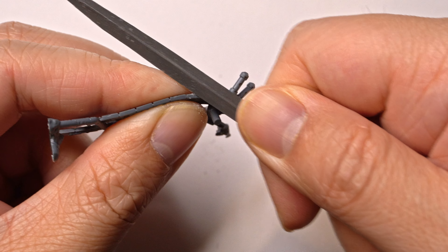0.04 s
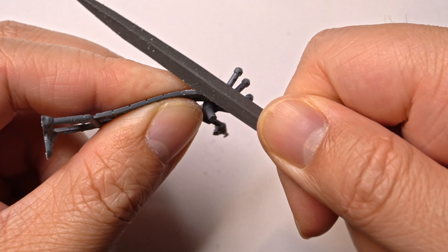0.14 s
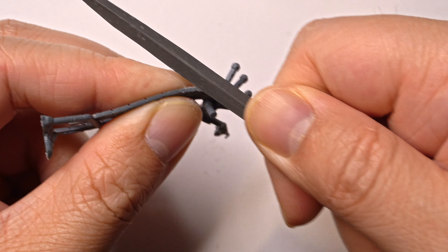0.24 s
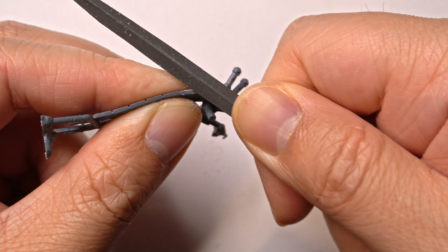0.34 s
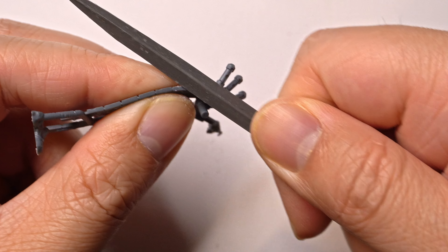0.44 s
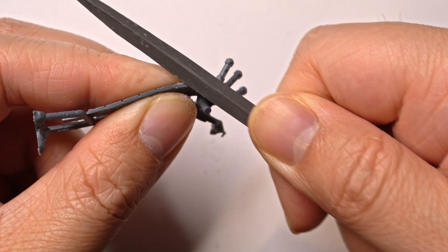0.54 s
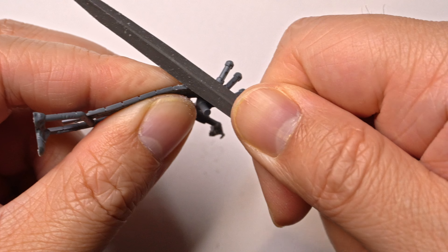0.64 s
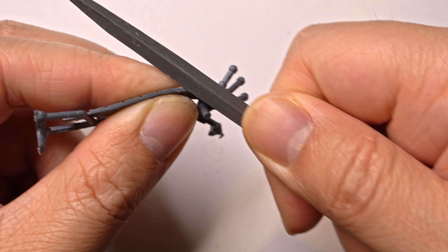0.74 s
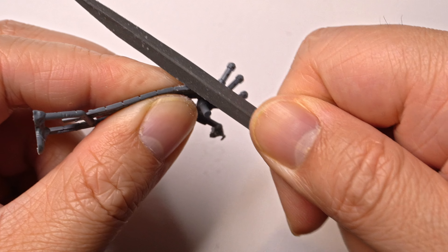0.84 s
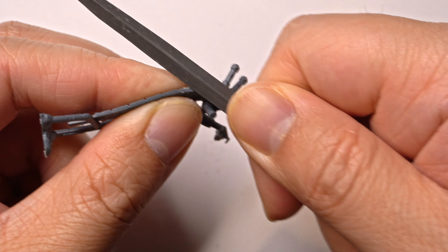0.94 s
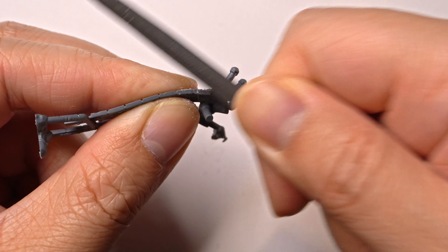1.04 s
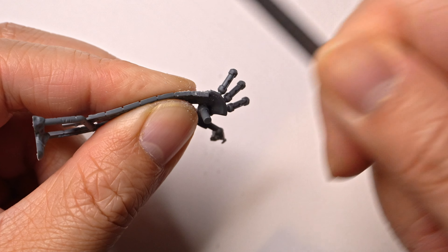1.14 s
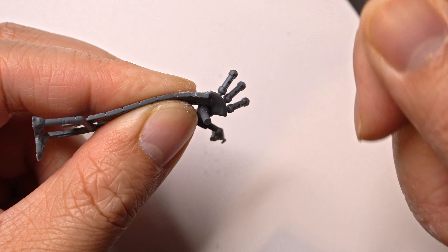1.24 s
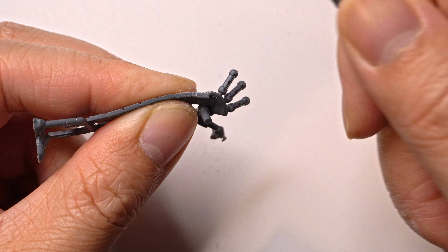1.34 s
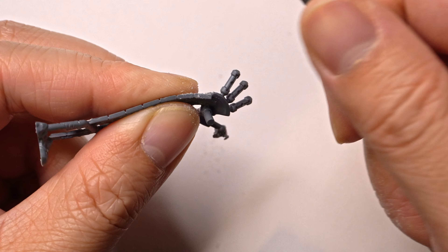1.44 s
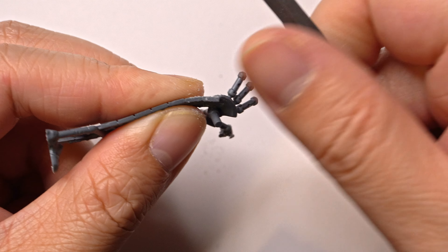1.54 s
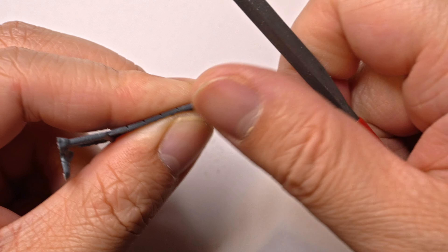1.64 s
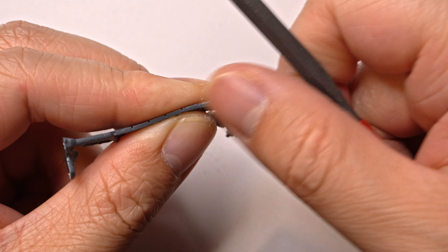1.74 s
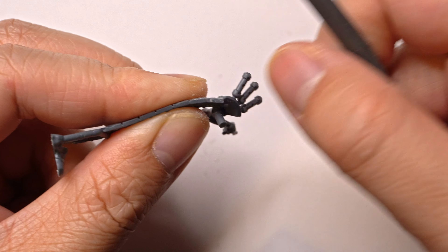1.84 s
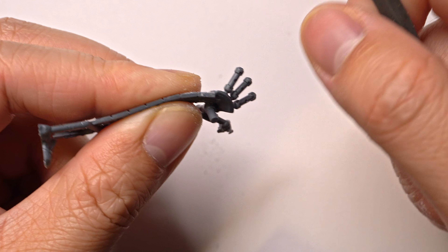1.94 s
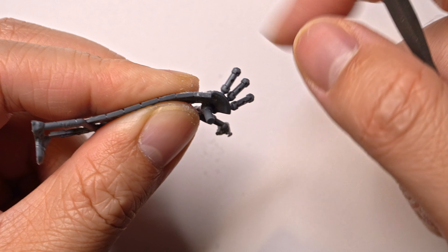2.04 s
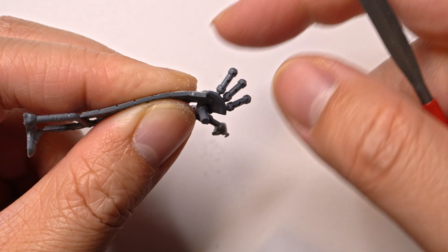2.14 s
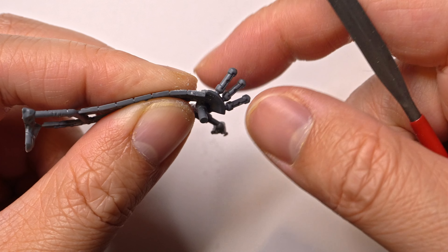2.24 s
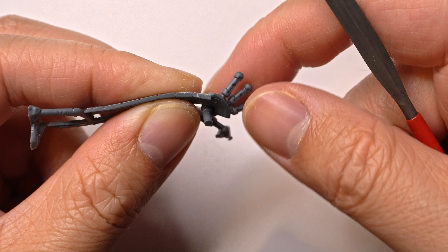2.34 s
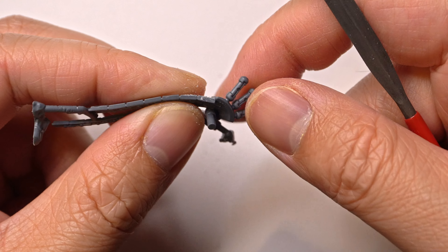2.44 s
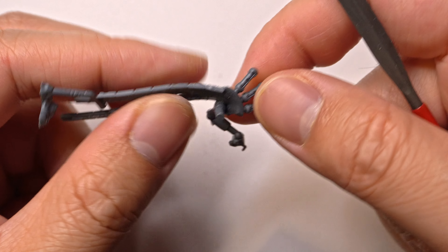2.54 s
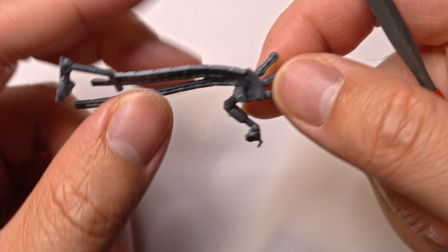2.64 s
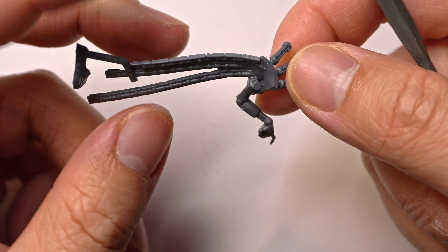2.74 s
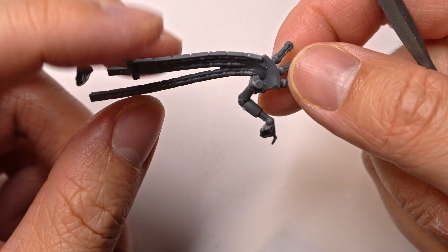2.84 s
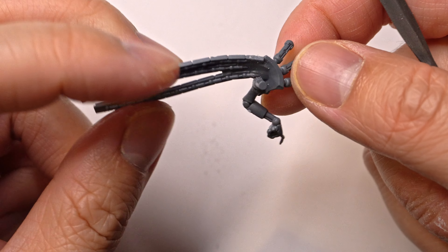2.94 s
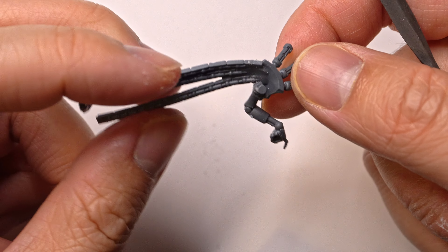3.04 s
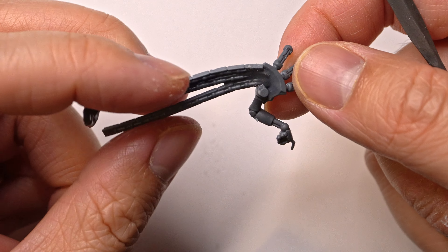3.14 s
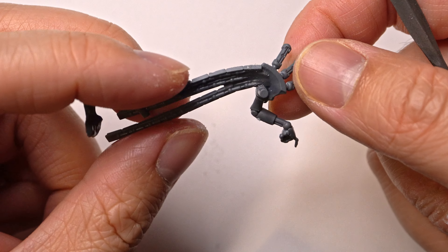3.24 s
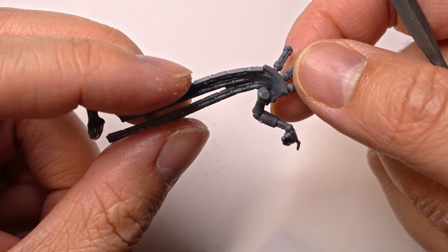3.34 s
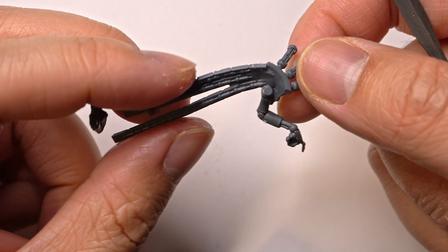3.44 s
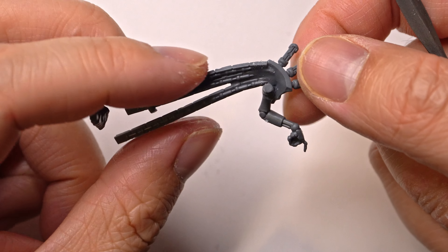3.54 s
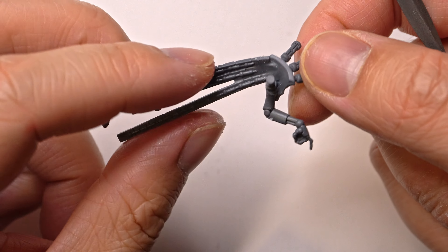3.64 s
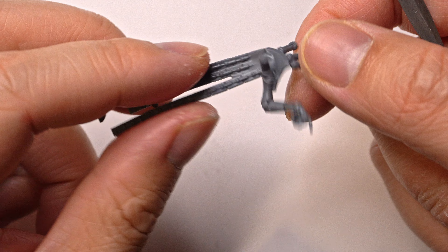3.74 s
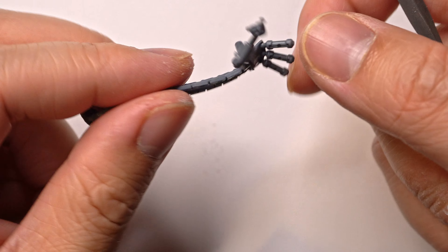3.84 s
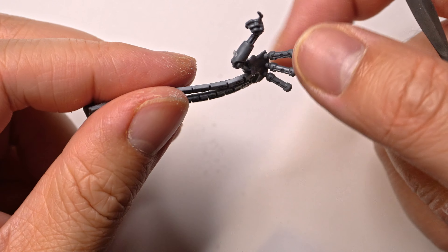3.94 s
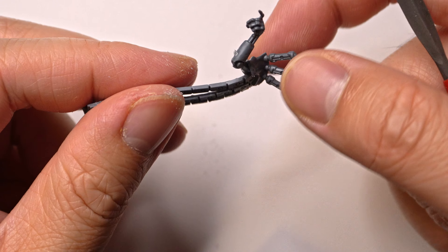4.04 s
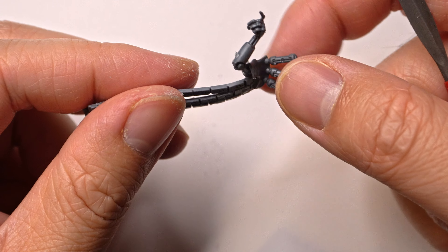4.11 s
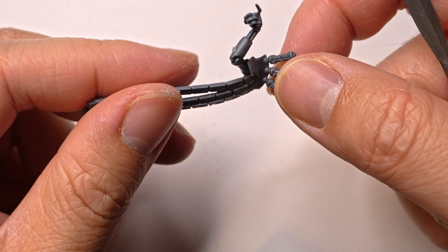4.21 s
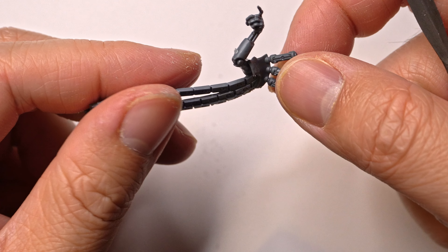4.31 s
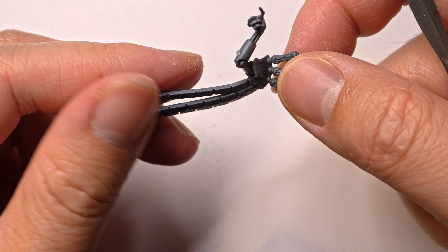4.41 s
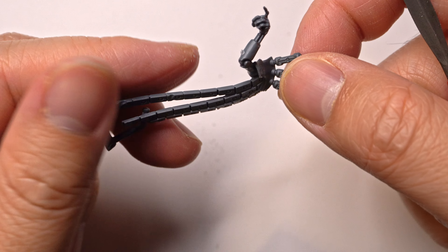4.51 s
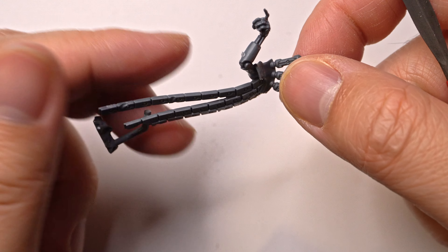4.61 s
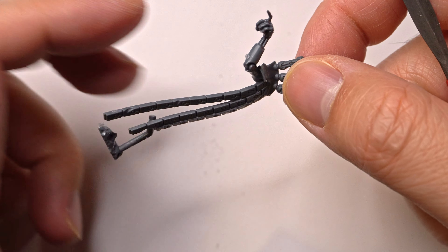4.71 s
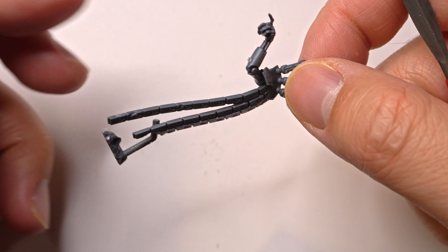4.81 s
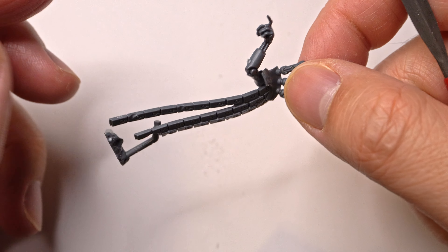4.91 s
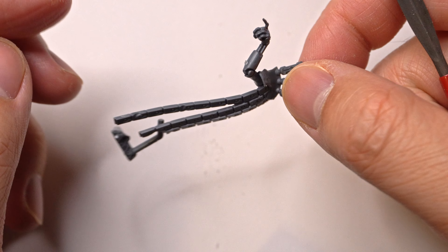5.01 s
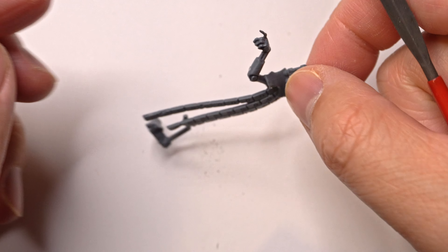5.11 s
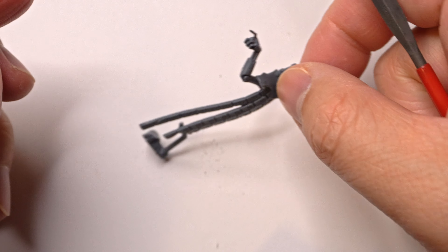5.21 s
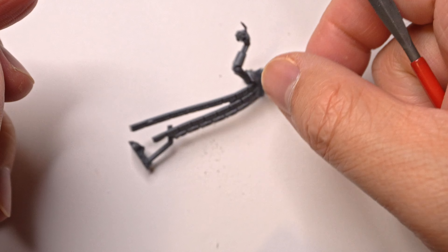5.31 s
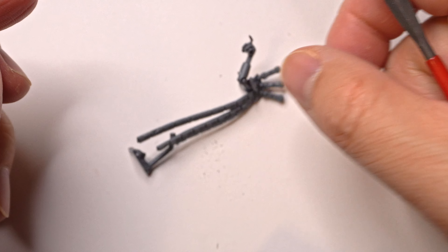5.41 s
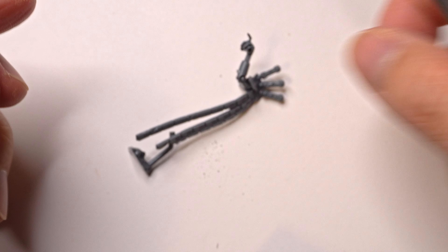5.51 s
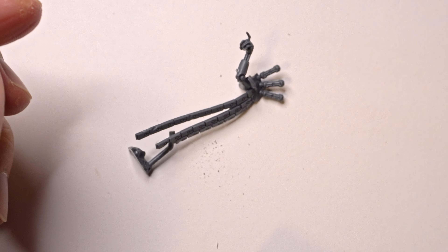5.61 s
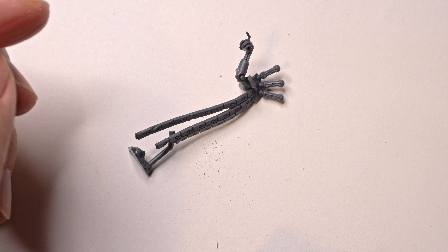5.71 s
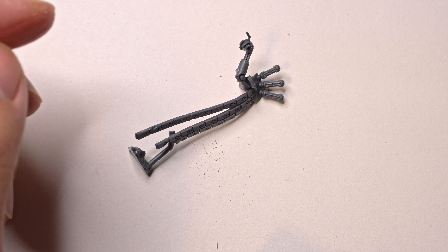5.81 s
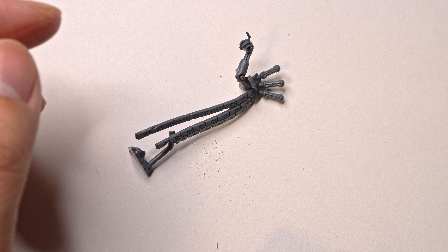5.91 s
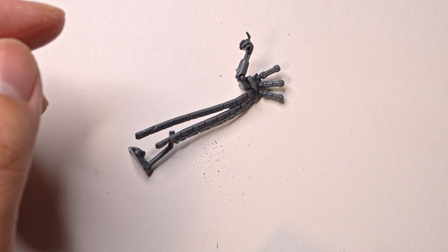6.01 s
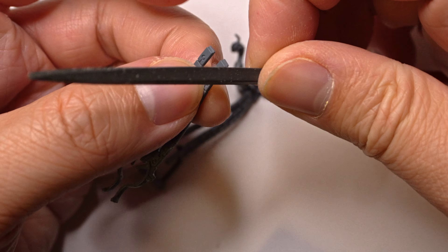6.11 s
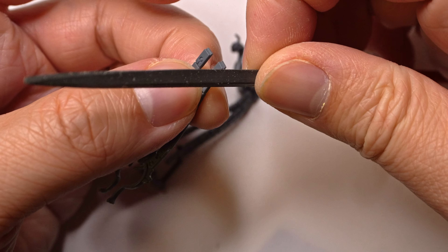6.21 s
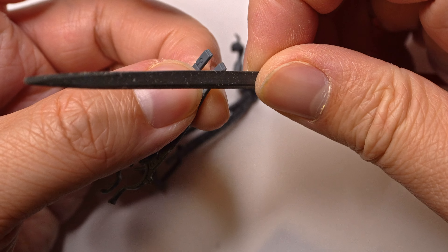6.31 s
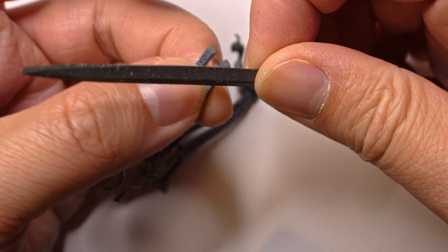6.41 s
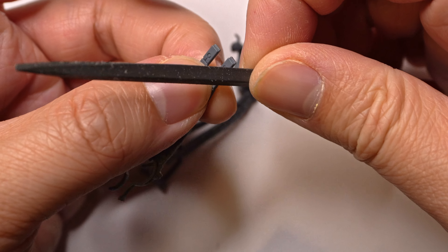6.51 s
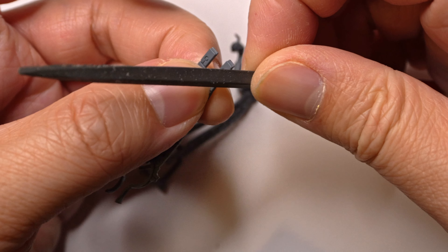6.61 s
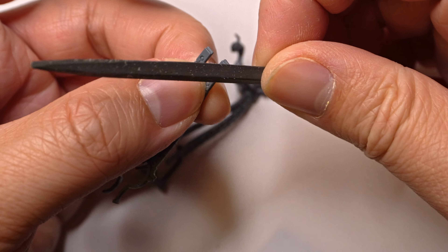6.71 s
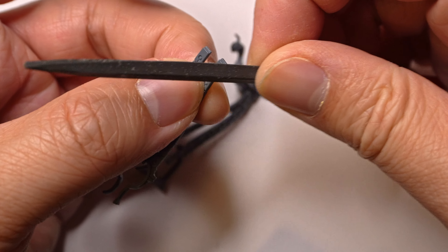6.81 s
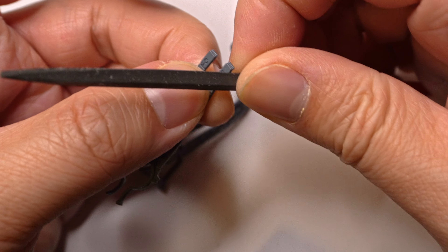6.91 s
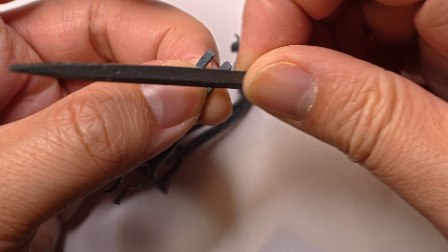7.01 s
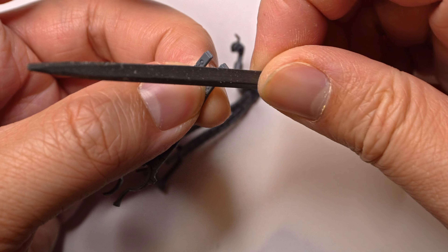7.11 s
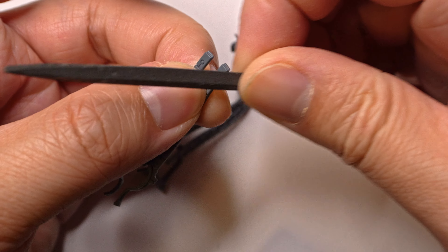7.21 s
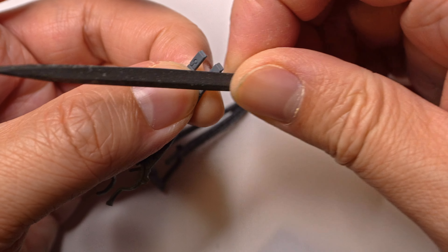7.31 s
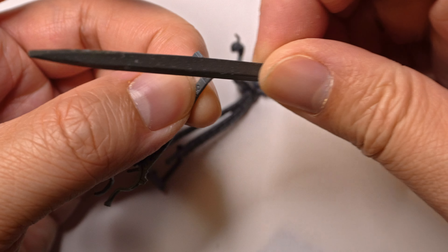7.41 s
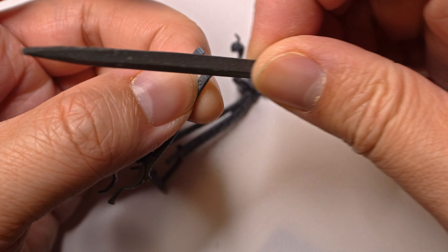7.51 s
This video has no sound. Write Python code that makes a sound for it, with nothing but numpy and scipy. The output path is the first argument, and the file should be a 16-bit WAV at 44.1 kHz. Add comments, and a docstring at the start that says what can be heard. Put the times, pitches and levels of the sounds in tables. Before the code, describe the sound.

A very close, dry stereo perspective in a quiet room, with faint air and a low stand hum that swells during work. From about 0.07 to 1.0 seconds, a needle file makes six quick rasps on a thin plastic figure, roughly six per second, each a short gritty hiss with a buzzing low judder and small ticks. From 1.1 to 5 seconds it is much quieter: fingertips rub, a stronger scuff and nail scrape come near 1.8, a soft release near 2.75, and a tiny limb flicks at 3.8. At 5.1 a hand swishes over paper; the figure touches down, stutters along, drops with a sharp click and boomy knock at 5.36, then rocks from 5.48 in rapid, shrinking taps. Near silence follows. From 6.43 to the end, seven strokes on a smaller bit rasp brighter, with irregular clusters of loud, crisp plastic snaps, strongest around 6.85 and 7.2.

```python
"""Filing small plastic parts

A needle file rasps over a plastic model figure and later a smaller bit, between two close microphones.
Its teeth are grainy noise; uneven slips and snags are impulses that click in the plastic and shake the grip.
In between, the figure is turned in the hand as noise bursts and thumps, then dragged over the desk in slips.
It drops and rocks to rest in shrinking steps. A quiet room and a humming microphone stand lie underneath.
"""
import sys
import numpy as np
from scipy import signal
from scipy.fft import rfft, irfft
from scipy.io import wavfile
from scipy.ndimage import uniform_filter1d

SR = 44100
rng = np.random.default_rng(int(sys.argv[2]) if len(sys.argv) > 2 else 0)


def wrap_up_sound(samples):
    """Save the sound to the file named by the first command line argument, as 16-bit audio."""
    columns = np.atleast_2d(samples).T
    # keep every value between -1 and 1, then stretch to whole-number steps
    tamed = np.clip(columns, -1, 1)
    steps = np.round(tamed * 32767).astype(np.int16)
    wavfile.write(sys.argv[1], SR, steps)


N = 333396
T = np.arange(N) / SR  # time of every sample [s]
TOP_HZ = 15800  # upper limit of the sound


def undb(db):
    """Turn decibels into gain."""
    return 10 ** (np.asarray(db) / 20)


def curve(rows, column):
    """Gain that follows a dB column over time, silent before and after it."""
    rows = np.array(rows)
    return undb(np.interp(T, rows[:, 0], rows[:, column], left=-np.inf, right=-np.inf))


def pulses(times, sizes):
    """One impulse of the given size at each time."""
    inside = (times >= 0) & (times < T[-1])
    samples = (times[inside] * SR).astype(int)
    return np.bincount(samples, sizes[inside], N)


def response(spectrum, size=2048):
    """Impulse responses with the given spectrum that start at once, scaled to a mean energy of 1."""
    hz, *sides = np.transpose(spectrum)
    log_hz = np.log(np.fft.rfftfreq(size, 1 / SR) + 1)
    gains = undb([np.interp(log_hz, np.log(hz), db) for db in sides])
    # folding the cepstrum moves the energy to the start (minimum phase)
    cepstrum = irfft(np.log(gains))
    cepstrum[:, 1:size // 2] *= 2
    cepstrum[:, size // 2 + 1:] = 0
    h = irfft(np.exp(rfft(cepstrum)))
    return h / np.sqrt(np.sum(h ** 2) / len(h))


def colour(x, spectrum):
    """Pass a sound through a body, which favours some frequencies over others."""
    return signal.oaconvolve(np.atleast_2d(x), response(spectrum), axes=1)[:, :N]


def thump(hits, spectrum, lag_ms, polarity):
    """Each impulse swings a body; the right microphone hears it a little later, scaled by polarity."""
    peak = np.abs(response(spectrum)).max(axis=1).mean()
    left, right = colour(hits, spectrum)[[0, -1]] / peak
    return np.array([left, polarity * np.interp(T - lag_ms / 1000, T, right)])


def noise(opposed):
    """Noise pair; a thing vibrating between the microphones pushes on one as it pulls on the other."""
    share = np.clip(opposed, 0, 1)
    push_pull = rng.standard_normal(N) * np.array([[1], [-1]])
    separate = rng.standard_normal((2, N))
    return np.sqrt(share) * push_pull + np.sqrt(1 - share) * separate


def fade(hits, decay_s):
    """Envelope of impulses that each die away; their powers add."""
    power = signal.lfilter([1], [1, -np.exp(-2 / (decay_s * SR))], hits ** 2 + 1e-18)
    return np.sqrt(power)


def grains(per_s, spread_db, decay_s):
    """Envelope of dense tiny slips of uneven size, scaled to an rms of 1."""
    sizes = undb(spread_db * np.minimum(rng.exponential(size=N), 4))
    happens = rng.random(N) < per_s / SR
    envelope = fade(sizes * happens, decay_s)
    return envelope / np.sqrt(np.mean(envelope ** 2))


def walk(rate):
    """Smooth random drift towards a new value `rate` times a second, spread near 1."""
    k = int(SR / rate)
    steps = np.repeat(rng.standard_normal(N // k + 1), k)
    return np.sqrt(2) * uniform_filter1d(steps, k)[:N]


def slips(rate_hz, jitter, scatter_db, count=400):
    """Times and sizes of stick-slip releases at a changing rate; the first comes as the motion starts."""
    chance = rng.standard_normal((count, 2))
    chance[0] = 0
    travel = np.cumsum(rate_hz) / SR
    marks = np.cumsum(np.exp(jitter * chance[:, 0])) - 1
    reached = marks < travel[-1]
    times = T[np.searchsorted(travel, marks[reached], side="right")]
    return times, undb(scatter_db * chance[reached, 1])


def swell(centre_s, width_s):
    """Speed of one movement: it grows and dies away smoothly."""
    return np.exp(-np.minimum(((T - centre_s) / width_s) ** 2, 20))


def burst(centre_s, half_s):
    """A short slide that starts and stops quickly and is level in between."""
    return np.exp(-np.minimum(((T - centre_s) / half_s) ** 2, 4) ** np.e)


# the fingers take a new grip: (time [s], level [dB])
REGRIPS = [(1.1, -53), (1.79, -43.5), (2.52, -51.5), (2.9, -63), (3.46, -52.5), (4.17, -50)]


def gripping():
    """How hard the fingers are working as they take a new grip."""
    half_length_s = 0.14
    return sum(undb(db) * swell(s, half_length_s) for s, db in REGRIPS)


# tone of the room: (frequency [Hz], level [dB])
ROOM_TONE = [(25, 1), (80, 5.5), (200, 0.5), (600, -9), (2000, -16), (8000, -17.5), (15500, -18.5)]
# hum of the microphone stand: (frequency [Hz], level [dB])
STAND_TONE = [(20, -35.5), (38, -17.5), (45, 2.5), (53, -30), (90, -13.5), (300, -35.5), (900, -76)]
ROOM_DB = -58.5  # middle of a slight drift
STAND_REST_DB, STAND_FILING_DB = -56.5, -38  # hum at rest, and what filing adds
STAND_GRIP_DB = 4  # relative to the new grip
FILING_ENDS_S, FILING_RESUMES_S = 1.07, 6.5
LIGHT_FILING_DB = -2  # the small bit takes less effort


def room():
    """A quiet room; the microphone stand hums low, more while the arms are filing or changing grip."""
    figure_work = T < FILING_ENDS_S
    small_bit_work = undb(LIGHT_FILING_DB) * (T > FILING_RESUMES_S)
    working = uniform_filter1d(figure_work + small_bit_work, size=8000)
    effort = undb(STAND_REST_DB) + undb(STAND_FILING_DB) * working + undb(STAND_GRIP_DB) * gripping()
    air = colour(noise(opposed=0.37), ROOM_TONE) * undb(ROOM_DB + 0.55 * walk(7.8))
    hum = colour(noise(opposed=0.62), STAND_TONE) * effort * undb(2 * walk(2))
    return air + hum


# the file snags once on an edge: (time [s], tick level [dB], thump level [dB])
SNAGS = [(0.2491, -21, -13.5), (0.4484, -17, -22), (0.5855, -20, -12.5), (0.7596, -23.5, -16.5),
         (0.9133, -21, -10), (1.041, -21, -23), (6.4278, -13, -13.5), (6.4434, -21, -12),
         (6.4515, -18.5, -13.5), (6.4735, -12.5, -14.5), (6.6502, -11.5, -25), (6.659, -9.5, -25),
         (6.8484, -0.5, -16), (6.856, -6, -20), (6.8667, -6.5, -20), (7.0657, -13.5, -18),
         (7.0783, -12.5, -20), (7.148, -12.5, -27), (7.1681, -11.5, -15.5), (7.1918, -4.5, -16.5),
         (7.2005, -2.5, -19), (7.2074, -11, -19), (7.2148, -10.5, -20), (7.224, -7, -20),
         (7.2383, -4.5, -30), (7.5134, -14.5, -20.5), (7.5335, -6.5, -18), (7.5522, -11.5, -21)]
SNAG_HOLD_S = .004  # no ordinary slips this close to a snag
# where the file is fastest, how it speeds up and slows, as shares of the stroke
STROKE_PEAK, STROKE_RISE, STROKE_FALL = .42, .47, .64
JUDDER_JITTER, JUDDER_SCATTER_DB = .2, 1  # unevenness of the slips in time and size
SNAP_SCATTER_DB = 4  # unevenness of the crackle


def stroke(bite_s, length_s, hiss_db, shake_db, crackle_db, rate_hz, treble_db, count=64):
    """One push of the file: it hisses with its speed and judders in slips, except where a snag holds it."""
    peak_s = bite_s + STROKE_PEAK * length_s
    speed = swell(peak_s, length_s * np.where(T < peak_s, STROKE_RISE, STROKE_FALL))
    biting = (T > bite_s) * (T < bite_s + length_s)
    at, size = slips(rate_hz * np.sqrt(speed) * biting, JUDDER_JITTER, JUDDER_SCATTER_DB)
    free = np.abs(np.array(SNAGS)[:, 0] - at[:, None]).min(axis=1) > SNAG_HOLD_S
    uneven = undb(SNAP_SCATTER_DB * np.tanh(rng.standard_normal(count)[:len(at)]))
    hiss = undb(hiss_db) * speed
    treble = undb(hiss_db + treble_db) * speed
    grind = undb(shake_db) * speed ** 2
    crackle = pulses(at, undb(crackle_db) * free * uneven) * np.sqrt(speed)
    judder = pulses(at, undb(shake_db) * free * size) * np.sqrt(speed)
    return np.array([hiss, treble, grind, crackle, judder])


PING_HZ, PING_SPREAD, PING_DECAY_S, PING_DB = 9830, 0.18, 0.0014, -9.5  # typical pitch, its scatter


def ping(times, sizes, size=256):
    """Each snap rings two modes of the edge, which depend on where the tooth caught."""
    out = np.zeros((2, N + size))
    decay = np.exp(-T[:size] / PING_DECAY_S)
    for s, gain, chance in zip(times, sizes, rng.standard_normal((len(times), 2, 2))):
        hz = np.minimum(PING_HZ * np.exp(PING_SPREAD * chance[0]), TOP_HZ)
        phase = np.array([np.zeros(2), np.pi + chance[1]])  # the far microphone hears it roughly opposed
        modes = np.sin(2 * np.pi * hz[:, None] * T[:size] + phase[:, :, None]).sum(axis=1)
        start = int(s * SR)
        out[:, start:start + size] += gain * modes * decay
    return undb(PING_DB) * out[:, :N]


TIP_ECHO_S, TIP_ECHO_DRIFT, TIP_ECHO_DB = 0.000797, 0.206, -11  # typical delay, how far it wanders


def wander(x):
    """The contact point moves along the blade, so the echo from its tip shifts the rasp's resonances."""
    lag_s = TIP_ECHO_S * np.exp(TIP_ECHO_DRIFT * walk(14))
    echo = np.array([np.interp(T - lag_s, T, side) for side in x])
    return (x + undb(TIP_ECHO_DB) * echo) / np.hypot(1, undb(TIP_ECHO_DB))


# file strokes, six on the figure, then the small bit: (bite time [s], length [s], tooth hiss level [dB],
# judder level [dB], crackle level [dB], top judder rate [Hz], extra treble level [dB])
STROKES = [(0.067, 0.085, -43.5, -16.5, -28.5, 189.6, -6), (0.24, 0.084, -43.5, -14.5, -24, 169.9, -7),
           (0.409, 0.068, -40.5, -14, -25.5, 252.4, -4), (0.5745, 0.076, -43.5, -13.5, -26.5, 150.1, -6),
           (0.751, 0.069, -45, -16.5, -36, 170.3, -3.5), (0.897, 0.098, -41, -16, -28.5, 170, -2),
           (6.428, 0.089, -40, -23, -34, 132.8, -7), (6.651, 0.075, -47.5, -26, -46, 154.2, -10),
           (6.849, .078, -41, -17.5, -24.5, 199.7, -5), (7.032, 0.073, -37.5, -19.5, -34, 200, -6.5),
           (7.192, 0.084, -41.5, -17.5, -21.5, 169.3, -19), (7.35, 0.098, -45, -25.5, -38, 171.1, 0.5),
           (7.534, 0.069, -38, -18.5, -13.5, 169.4, 1)]
# tone of the figure: (frequency [Hz], left level [dB], right level [dB])
FIGURE_TONE = [(300, -9, -18), (750, -1.5, 0), (1690, -12, -10), (2400, 0, -0.5), (3200, -7.5, -1.5),
               (5300, -7.5, -4.5), (7500, -12, -13), (8400, -4.5, -4.5), (12400, -4, -5.5),
               (15600, -27, -18)]
# tone of the small bit: (frequency [Hz], left level [dB], right level [dB])
SMALL_BIT_TONE = [(286, 3.5, -5), (910, 5.5, 2), (1760, -4, -8), (3070, -1, -0.5), (6160, -7.5, -4),
                  (8800, -1, 1.5), (12100, -3.5, -11), (15300, -22, -16)]
# click of plastic as a tooth snaps free: (frequency [Hz], level [dB])
SNAP_TONE = [(300, 3), (1000, -3), (2100, -21), (3300, 6), (5000, -0.5), (8800, 3), (11400, -2),
             (13300, -4.5), (15400, -15.5)]
# low shaking of the gripping fingers: (frequency [Hz], left level [dB], right level [dB])
GRIP_TONE = [(31.5, -30, -23), (74, -5.5, -9.5), (130, 3, 0), (213, 0, -2.5), (380, -10.5, -16),
             (702, -18.5, -21), (830, -23, -36), (3100, -49.5, -42)]
HISS_TREBLE_HZ, BRIGHT_DRIFT_DB = 7460, 2  # the top of the hiss rises and falls as the file tilts
# the file stays lightly on the part between pushes, and a little before and after
GLIDE_DB, GLIDE_MARGIN_S = -63.5, 0.16


def filing(rows, spectrum, hiss_db, click_db, tick_db, judder_db, grind_db, tick_s, grain_db, grain_s):
    """Teeth hiss over one part; every slip of the file ticks in the plastic and shakes the grip."""
    hiss, treble, grind, crackle, judder = sum(stroke(*row) for row in rows)
    first_s, last_s = rows[0][0], rows[-1][0]
    snags = [row for row in SNAGS if first_s - .5 < row[0] < last_s + .5]
    times, ticks, thumps = np.transpose(snags)

    snaps = pulses(times, undb(ticks)) + crackle
    click = undb(click_db) * colour(snaps, SNAP_TONE)[0]
    # one microphone is pushed, the other pulled
    clicks = np.array([click, -np.roll(click, 1)]) + ping(times, undb(ticks))
    crack = undb(tick_db) * fade(snaps, tick_s)  # a shaving tears off after each snap

    grain = grains(per_s=980, spread_db=grain_db, decay_s=grain_s)
    teeth = undb(hiss_db) * noise(opposed=0.2) * grain
    low, high = (signal.sosfilt(signal.butter(3, HISS_TREBLE_HZ, kind, fs=SR, output="sos"), teeth)
                 for kind in ("low", "high"))
    glide = undb(GLIDE_DB) * burst((first_s + last_s) / 2, (last_s - first_s) / 2 + GLIDE_MARGIN_S)
    tilt = undb(BRIGHT_DRIFT_DB * walk(14))
    scrape = low * (hiss + glide) + high * (treble + glide) * tilt
    rasp = wander(colour(scrape + noise(opposed=0.077) * crack, spectrum))

    shakes = pulses(times, undb(thumps)) + undb(judder_db) * judder
    shaking = thump(shakes, GRIP_TONE, lag_ms=0.34, polarity=-0.96)
    grinding = colour(noise(opposed=0.78) * grind * undb(grind_db), GRIP_TONE)
    return clicks + rasp + shaking + grinding


# a fingertip slides over the plastic:
# (time [s], half length [s], soft pad level [dB], skin ridges level [dB], nail level [dB])
RUBS = [(1.1, 0.12, -61.5, -59.5, -62.5), (1.701, 0.022, -58, -66, -53.5),
        (1.789, 0.047, -44.5, -53.5, -41.5), (2.003, 0.041, -78, -62.5, -52.5),
        (2.687, 0.029, -59, -48.5, -53.5), (2.801, 0.12, -54, -65, -67), (2.99, 0.058, -64, -66.5, -79),
        (3.14, 0.025, -66, -61, -78), (3.249, 0.031, -69, -59.5, -69), (3.496, 0.083, -53, -84, -70.5),
        (3.638, 0.051, -51.5, -58, -60), (3.913, 0.067, -59.5, -49.5, -60.5),
        (4.063, 0.077, -63, -58.5, -64), (4.703, 0.15, -63, -59.5, -66.5), (4.855, 0.043, -68, -56.5, -65)]
# tone of the soft fingertip pad: (frequency [Hz], level [dB])
PAD_TONE = [(150, 0), (400, 1), (800, -2.5), (2800, -5.5), (5000, -16), (15500, -27)]
# tone of the skin ridges: (frequency [Hz], level [dB])
RIDGES_TONE = [(400, -27), (1500, -12.5), (2800, -3), (4300, 1), (6000, -8), (8000, -11.5), (12000, -18),
               (15500, -33)]
# tone of the nail: (frequency [Hz], level [dB])
NAIL_TONE = [(4000, -30), (7000, -6), (9300, 3.5), (11700, 3), (13000, 0), (15500, -6.5)]


def rubbing():
    """Skin drags over the plastic in tiny slips; each touch mixes pad, ridges and nail in its own way."""
    grain = grains(per_s=700, spread_db=2.5, decay_s=0.0061)
    out = 0
    for column, spectrum in enumerate((PAD_TONE, RIDGES_TONE, NAIL_TONE), start=2):
        touch = sum(undb(row[column]) * burst(*row[:2]) for row in RUBS)
        out = out + colour(noise(opposed=0.16) * grain * touch, spectrum)
    return out


# the figure shifts under the fingertips: (time [s], scuff level [dB], thump level [dB])
NUDGES = [(1.747, -44, -41), (1.776, -58, -30), (1.814, -41, -27.5), (2.524, -54, -38), (2.563, -47, -51),
          (2.631, -51, -37), (2.757, -46, -41), (3.799, -41, -40), (4.173, -49.5, -45), (6.148, -78.5, -34)]
# tone of the cupped hand: (frequency [Hz], level [dB])
PALM_TONE = [(200, -8), (380, 0), (520, 8), (800, -12), (1500, -10), (3000, -17.5), (8000, -30)]
# a thin limb slips off a fingertip and rings: (frequency [Hz], level [dB])
LIMB_RING = [(2200, -28), (2480, -7), (2590, -2), (2700, -7), (3100, -29)]
FLICK_S, FLICK_DECAY_S, FLICK_DB = 3.803, 0.0075, -32.5


def handling():
    """Skin rubs over the plastic, the fingers rumble, and now and then the figure shifts."""
    effort = gripping() * grains(per_s=110, spread_db=4.0, decay_s=0.01)
    rumble = colour(noise(opposed=0.75) * effort, GRIP_TONE)
    times, scuffs, thumps = np.transpose(NUDGES)
    scuff = colour(noise(opposed=0.32) * fade(pulses(times, undb(scuffs)), 0.026), FIGURE_TONE)
    shift = thump(pulses(times, undb(thumps)), GRIP_TONE, lag_ms=0.83, polarity=-0.54)
    # a fingertip lets go with a knock in the cupped hand
    let_go = fade(pulses(np.array([2.759]), undb([-35.0])), 0.013)
    release = colour(noise(opposed=0) * let_go, PALM_TONE)
    flick = fade(pulses(np.array([FLICK_S]), undb([FLICK_DB])), FLICK_DECAY_S)
    ring = colour(noise(opposed=0.15) * flick, LIMB_RING)
    return rubbing() + scuff + ring + release + rumble + shift


ROCK_START_S, ROCK_PERIOD_S = 5.478, .089  # start and length of the first rock
ROCK_KEEP, OTHER_FOOT = .70, .41  # length kept by each next rock; when the second foot taps, as a share
ROCK_TICK_DB, ROCK_THUD_DB, ROCK_FALL_DB = -33, -11, 3  # first rock, and the loss with each one
ROCK_TICK_SCATTER_DB = 5  # some taps land on a harder edge


def rocking(count=7):
    """Rows (time [s], tick [dB], thud [dB]) of two feet tapping in turn, faster and softer towards rest."""
    rock = np.arange(count)
    period = ROCK_PERIOD_S * ROCK_KEEP ** rock
    start = ROCK_START_S + np.cumsum(period) - period
    loss_db = ROCK_FALL_DB * rock
    hardness_db = ROCK_TICK_SCATTER_DB * rng.standard_normal((count, 2))
    taps = []
    for s, gap, loss, pair in zip(start, period, loss_db, hardness_db):
        for foot, hard_db in zip((0, OTHER_FOOT), pair):
            taps.append((s + foot * gap, ROCK_TICK_DB - loss + hard_db, ROCK_THUD_DB - loss))
    return taps


# the desk top hums on after each knock: (frequency [Hz], decay [s], level [dB])
DESK_MODES = [(120, 0.012, -28), (216, 0.032, -24.5), (338, 0.014, -20)]


def desk_ring(hits, size=16384):
    """The low modes of the desk top, pushing on one microphone as they pull on the other."""
    t = T[:size]
    ring = sum(undb(db) * np.sin(2 * np.pi * hz * t) * np.exp(-t / decay_s)
               for hz, decay_s, db in DESK_MODES)
    return signal.oaconvolve(hits, ring)[:N] * np.array([[.3], [-1]])


# the hand slides over the paper: (time [s], half length [s], level [dB])
SLIDE = [(5.115, 0.071, -33.5), (5.32, 0.019, -37.5), (5.501, 0.055, -42.5)]
# tone of the paper: (frequency [Hz], left level [dB], right level [dB])
PAPER_TONE = [(252, -17, -22), (712, -10, -8.5), (1300, -4.5, -2), (2020, -6, -8.5), (2840, -3.5, 1),
              (5130, -10, -0.5), (7960, -5, -2.5), (11900, -6, -2), (15600, -18.5, -9.5)]
# the figure stutters along the desk: (time [s], slip rate [1/s], level [dB])
DRAG = [(5.207, 115, -10.5), (5.236, 206, -19.5), (5.25, 125, -18.5), (5.28, 192, -21.5),
        (5.31, 200, -15.5), (5.335, 310, -27), (5.36, 270, -13.5)]
# tone of the dragged figure: (frequency [Hz], left level [dB], right level [dB])
DRAGGED_TONE = [(39.8, -35, -33.5), (90, -6, -3.5), (170, 3.5, 2), (334, -10.5, -9), (567, -26, -4.5),
                (860, -29.5, -28), (1100, -21, -15.5), (1700, -32, -32), (4960, -58.5, -65)]
# the figure touches down, drops and bounces on the desk: (time [s], tick level [dB], thud level [dB])
KNOCKS = [(5.198, -21.5, -6), (5.237, -45, -21), (5.364, 0, 1), (5.395, -17.5, -7), (5.406, -25.5, -21.5)]
# tone of the thin limbs: (frequency [Hz], level [dB])
LIMBS_TONE = [(300, -6.5), (1200, 4), (1700, -10), (2400, 1.5), (3000, 1), (4000, -10.5), (7500, -9),
              (11000, -12.5), (15500, -19)]
# tone of the knocked desk: (frequency [Hz], left level [dB], right level [dB])
DESK_TONE = [(40.3, -20, -36), (82.6, -10.5, 4), (159, -4, 11), (260, -8, 6.5), (413, -10, 0),
             (600, -22.5, -6.5), (970, -43, -18.5), (1600, -35, -26), (3030, -50, -33.5), (5960, -58, -61)]


def setting_down():
    """The hand swishes over the paper; the figure stutters along, drops, and rocks on the booming desk."""
    sliding = sum(undb(db) * swell(s, width) for s, width, db in SLIDE)
    swish = colour(noise(opposed=0.021) * sliding, PAPER_TONE)

    s, rate_hz, _ = np.transpose(DRAG)
    at, size = slips(np.interp(T, s, rate_hz, left=0, right=0), jitter=.22, scatter_db=3)
    stutter = pulses(at, size) * curve(DRAG, 2)
    jerks = thump(stutter * undb(-1.5), DRAGGED_TONE, lag_ms=0.2, polarity=0.91)
    scrape = colour(noise(opposed=0) * fade(stutter, 0.0068) * undb(-13.0), DRAGGED_TONE)

    # the thin limbs skitter more as the drag speeds up, and once more as the figure tips over
    drag_speed = np.interp(T, s, rate_hz) / rate_hz.max()
    skitter = (fade(pulses(at, size), 0.01) * drag_speed + swell(5.584, 0.023)) * undb(-32.5)
    times, ticks, thuds = np.transpose(KNOCKS + rocking())
    taps = fade(pulses(times, undb(ticks)), 0.00088)
    clicks = colour(noise(opposed=0.3) * np.hypot(skitter, taps), LIMBS_TONE)

    hits = pulses(times, undb(thuds))
    knocks = thump(hits, DESK_TONE, lag_ms=0.62, polarity=-0.66)
    return swish + jerks + scrape + clicks + knocks + desk_ring(hits)


def reflections(x, db, decay_s, low_hz, size=1024):
    """Hands, desk and housing scatter the treble back within milliseconds, differently to each side."""
    tail = rng.standard_normal((2, size)) * np.exp(-T[:size] / decay_s)
    tail = signal.sosfilt(signal.butter(2, low_hz, "high", fs=SR, output="sos"), tail)
    tail = tail / np.sqrt(np.sum(tail ** 2) / 2)
    return x + undb(db) * signal.oaconvolve(x, tail, axes=1)[:, :N]


def scene():
    """File the figure, turn it, set it down, file a smaller bit."""
    figure = filing(STROKES[:6], FIGURE_TONE, hiss_db=6.0, click_db=0.5, tick_db=-9.5, judder_db=-5.0,
                    grind_db=-7.0, tick_s=0.0069, grain_db=2.5, grain_s=0.004)
    small_bit = filing(STROKES[6:], SMALL_BIT_TONE, hiss_db=0.5, click_db=4, tick_db=-12.5, judder_db=-1,
                       grind_db=-4.5, tick_s=0.0016, grain_db=4.5, grain_s=0.00087)
    close = figure + small_bit + handling() + setting_down()
    return reflections(close, db=-15.0, decay_s=0.0031, low_hz=1940) + room()


DC_OFFSET = -.0137  # share of full scale, before the top is cut


def record(dry):
    """The converter sits slightly off zero, peaks beyond full scale clip, and the top is cut."""
    clipped = np.clip(dry + DC_OFFSET, -1, 1)
    return signal.sosfilt(signal.ellip(8, .2, 70, TOP_HZ, fs=SR, output="sos"), clipped)


dry = scene()
out = record(dry)
wrap_up_sound(out)
```